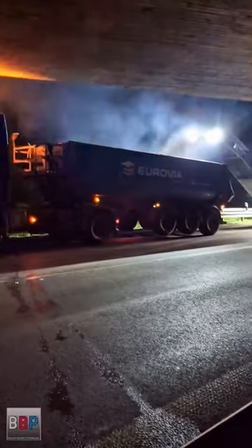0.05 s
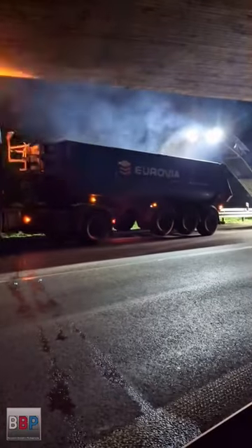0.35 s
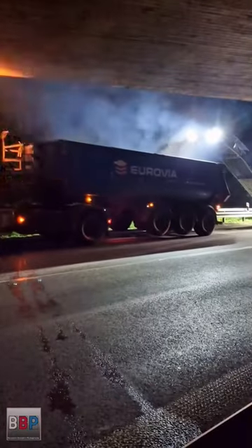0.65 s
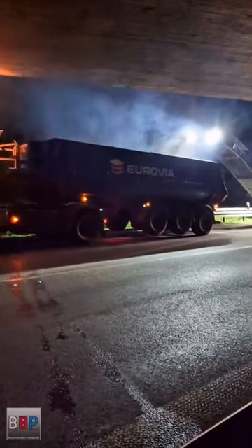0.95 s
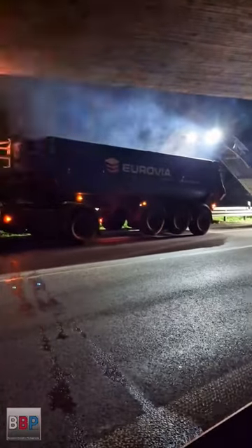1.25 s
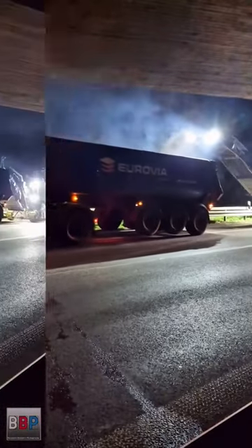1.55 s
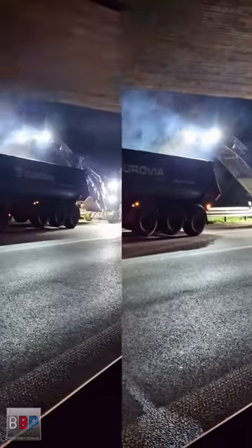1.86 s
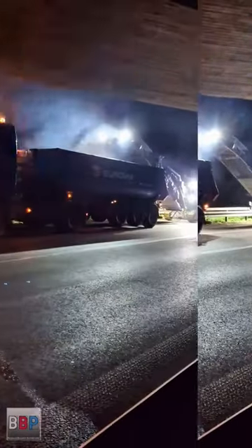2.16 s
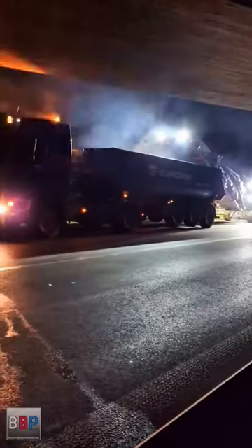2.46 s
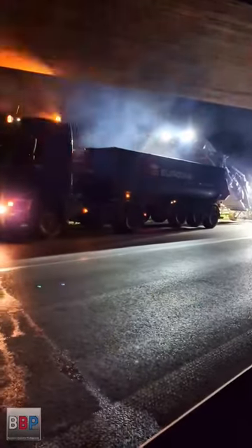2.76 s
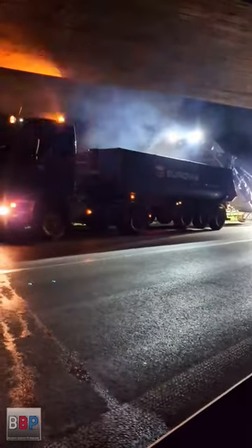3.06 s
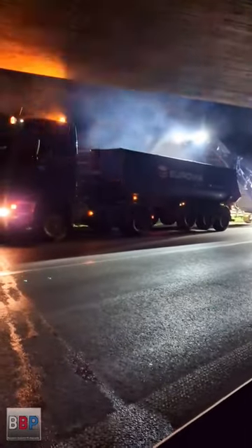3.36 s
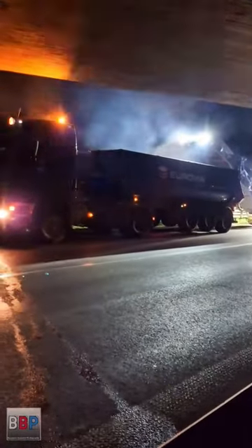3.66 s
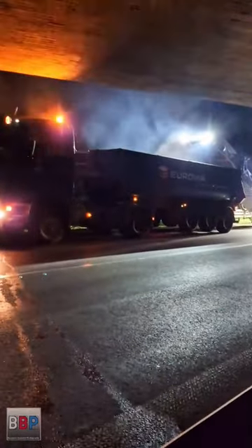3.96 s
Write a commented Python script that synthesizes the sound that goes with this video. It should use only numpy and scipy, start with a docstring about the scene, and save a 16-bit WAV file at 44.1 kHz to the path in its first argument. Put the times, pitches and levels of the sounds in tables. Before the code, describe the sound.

A heavy diesel truck idles over rumbling, hissing road machinery, with faint rattles.

```python
"""Under a concrete bridge at night roadworks, a heavy tipper truck idles while machines work behind it.
Its diesel makes low tones and a knock at each firing, and the knocks echo off the concrete.
The machines rumble, roar, drone, hiss and rasp, and a low engine hum throbs unevenly.
Loose parts rattle faintly, grit ticks on steel, and a valve lets off one short puff of air."""
import sys
import numpy as np
from scipy import signal
from scipy.fft import rfft, irfft
from scipy.io import wavfile

SR = 44100
rng = np.random.default_rng(int(sys.argv[2]) if len(sys.argv) > 2 else 0)


def to_wav(sig):
    """Store sig (one row per channel, or 1-D mono) as 16-bit WAV at the path in sys.argv[1].

    Samples outside -1..1 are clipped; the rate is SR.
    """
    pcm = np.clip(np.atleast_2d(sig), -1, 1) * 32767
    pcm = np.round(pcm).astype(np.int16)
    wavfile.write(sys.argv[1], SR, pcm.T)  # frames by channels


N = 176400
TIME_S = np.arange(N) / SR
FREQS_HZ = np.fft.rfftfreq(N, 1 / SR)


def gain(db):
    """Turns decibels into a number to multiply by."""
    return 10 ** (np.asarray(db) / 20)


def unit(x):
    """Scales a signal to an average (rms) size of 1."""
    return x / np.sqrt(np.mean(x ** 2) + 1e-20)


def across_pitch(table):
    """Joins a table's points into a value for every frequency."""
    hz, value = np.transpose(table)
    return np.interp(np.log(FREQS_HZ + 1), np.log(hz + 1), value)


def over_time(table, column=1):
    """Joins a table's levels into a gain for every moment."""
    rows = np.array(table)
    return gain(np.interp(TIME_S, rows[:, 0], rows[:, column]))


def drift(rate_hz):
    """Random wandering of size 1, mostly slower than rate_hz."""
    return unit(irfft(rfft(rng.standard_normal(N)) / (1 + (FREQS_HZ / rate_hz) ** 2), N))


def noise():
    """Two unrelated white noises."""
    return rng.standard_normal((2, N))


# How alike the left and right sides sound: pitch_hz, likeness (0 to 1)
SIDE_LIKENESS = [(100, 0.99), (260, 0.99), (360, 0.84), (520, 1), (720, 0.83), (860, 0.25), (1120, 0.78),
                 (1500, 0.3), (2000, 0.49), (2600, 0.036), (15000, 0.027)]
# How much louder the left side is: pitch_hz, difference_db
LEFT_LOUDER = [(100, 0.4), (300, -2), (390, 4), (520, -1), (750, -1.5), (1020, 2), (1500, -5.5), (2000, -7),
               (2600, -1), (4100, -7), (5000, 1), (6300, 3.5), (7300, -0.5), (9500, 3), (11800, -2),
               (15000, 0)]
# How far the left side's wave runs ahead: pitch_hz, phase_rad
LEFT_AHEAD = [(50, 0.05), (350, 0.26), (520, -0.8), (840, 0.85), (1130, -1), (1550, 0.5), (1800, 1.9),
              (2100, 1.45), (2400, 3.5)]

def stereo(pair, colour_db):
    """Colours two noises (sets how strong each pitch is) and spreads them left and right at size 1."""
    shared, separate = rfft(pair)
    alike = np.clip(across_pitch(SIDE_LIKENESS), 0, 1)
    lean = gain(across_pitch(LEFT_LOUDER) / 2)
    left = shared * lean * np.exp(1j * across_pitch(LEFT_AHEAD))
    right = (alike * shared + np.sqrt(1 - alike ** 2) * separate) / lean
    sides = irfft(np.array([left, right]) * gain(colour_db), N)
    return sides / np.std(sides.mean(0))


def bridge_echo(x, fade_60db_s=0.62, delay_s=.012, strength=1.3):
    """Sound bounces off the concrete deck and returns as a dense, fading echo."""
    t = TIME_S[:SR // 2]
    tail = rng.standard_normal((2, len(t))) * gain(-60 * t / fade_60db_s) * (t > delay_s)
    tail /= np.linalg.norm(tail, axis=1, keepdims=True)
    return x + strength * signal.fftconvolve(x, tail, axes=1)[:, :N]


# The engine's tones: waves_per_cycle (in one cycle, every cylinder fires once)
ENGINE_TONES = [6, 10, 12, 18, 20, 24, 30, 33]
# How strong each of those tones is: level_db
ENGINE_TONE_LEVELS = [-40.5, -37, -30.5, -32, -35, -29.5, -35.5, -35]
# How hard each of the six cylinders knocks: level_db
CYLINDER_LEVELS = [-1.5, -7.5, 1.5, -1.5, -1, -5.5]
# Colour of the knocks: pitch_hz, level_db
KNOCK_COLOUR = [(150, -22), (260, 1.5), (370, -8.5), (520, 4), (900, -10), (1500, -6), (2500, -17),
                (4000, -18.5), (7000, -36)]
# Slow swells of the engine's tones and the machinery: time_s, bass_db, middle_db
SWELLS = [(0, 1.5, 2.5), (0.35, 1, 0.8), (0.65, 1.1, 0.2), (0.95, 0.8, 1.0), (1.3, 1, 1.1),
          (1.55, 0.5, -0.4), (1.8, -3, -2.5), (2.05, -3.5, -3.2), (2.3, -1, -2), (2.55, 0.5, 0),
          (2.85, -0.5, -1.5), (3.15, -1, 1), (3.5, -1, -0.7), (3.75, -0.5, -0.6), (4, -3.5, -0.5)]

def diesel(firing_hz=35.73, speed_wander=.004, waver_db=3, knock_db=-34, knock_s=0.0071, scatter_db=3.5):
    """Cylinders fire in turn, making low tones and knocks that follow one slightly wandering speed."""
    firings = np.cumsum(firing_hz * (1 + speed_wander * drift(1.5))) / SR
    cylinders = len(CYLINDER_LEVELS)
    tones = 0
    for waves, db in zip(ENGINE_TONES, ENGINE_TONE_LEVELS):
        peak = gain(db + waver_db * drift(1.3)) * np.sqrt(2)
        tones += peak * np.sin(2 * np.pi * (waves * firings / cylinders + rng.random()))
    count = firings.astype(int)
    uneven_db = scatter_db * rng.standard_normal(400)[count]
    strength = gain(np.array(CYLINDER_LEVELS)[count % cylinders] + uneven_db)
    since_firing_s = (firings % 1) / firing_hz
    knocks = noise() * strength * np.exp(-since_firing_s / knock_s)
    clatter = stereo(bridge_echo(knocks), across_pitch(KNOCK_COLOUR))
    return over_time(SWELLS) * tones + gain(knock_db) * clatter


def panel_ring(hz, width_hz):
    """A shaken steel panel rings around one pitch."""
    return stereo(noise(), -20 * np.log10(1 + (2 * (FREQS_HZ - hz) / width_hz) ** 2))


# Colour of the machines' low rumble: pitch_hz, level_db
RUMBLE_COLOUR = [(12, -40), (20, -19), (36, -21), (62, -4.5), (112, -1), (166, -3), (238, -4.5), (300, -9),
                 (370, -17), (490, -33), (840, -120)]
# Colour of their higher roar: pitch_hz, level_db
ROAR_COLOUR = [(220, -50), (380, -9), (470, -1.5), (513, -2), (559, -1), (665, -7.5), (772, -5.5),
               (941, -9.5), (1270, -11.5), (1490, -11), (1700, -15), (2040, -15.5), (2500, -25.5),
               (3250, -67), (5500, -120)]
# Their ringing steel panels: pitch_hz, width_hz, level_db
STEEL_PANELS = [(401, 12.5, -40.5), (472, 25, -37.5), (569, 76, -36.5), (1502, 28, -44), (3465, 130, -52.5)]

def machinery(rumble_db=-18.5, roar_db=-25.5, rumble_shudder_db=1.0, roar_shudder_db=0.98):
    """Road machines rumble and roar with one shared shudder while their panels ring."""
    shudder = drift(rate_hz=25)
    rumble = gain(rumble_db + rumble_shudder_db * shudder) * stereo(noise(), across_pitch(RUMBLE_COLOUR))
    roar = gain(roar_db + roar_shudder_db * shudder) * stereo(noise(), across_pitch(ROAR_COLOUR))
    panels = sum(gain(db) * panel_ring(hz, width_hz) for hz, width_hz, db in STEEL_PANELS)
    bass, middle = over_time(SWELLS, column=1), over_time(SWELLS, column=2)
    return bass * rumble + middle * (roar + panels)


# Rise and fall of the deepest bass: time_s, boost_db
DEEP_SWELLS = [(0, 7), (.13, -5), (.45, -3), (.8, 1.5), (1.17, 1.5), (1.3, -4), (1.5, 0), (1.72, 3),
               (1.8, -9), (2.0, -4), (2.08, 4), (2.4, -2), (2.8, 2), (2.97, -1), (3.27, 3.5), (3.42, -4),
               (3.55, 0), (3.92, 5.5)]

def heave(x, below_hz=83):
    """Makes the deepest bass of a sound swell and sink."""
    deep = irfft(rfft(x) / (1 + (FREQS_HZ / below_hz) ** 8), N)
    return x + (over_time(DEEP_SWELLS) - 1) * deep


def wavering_tone(hz, wander_hz):
    """A held tone whose pitch wanders by about wander_hz."""
    turns = np.cumsum(hz + wander_hz * drift(rate_hz=9)) / SR + rng.random()
    return np.sqrt(2) * np.sin(2 * np.pi * turns)


# The hum that the bridge gathers: time_s, level_db
HUM_LEVELS = [(0, -32), (.3, -34), (.65, -35), (.95, -28), (1.3, -27), (1.65, -31), (1.85, -27), (2.1, -33),
              (2.55, -32), (2.9, -26), (3.2, -28), (3.5, -23.5), (3.75, -24.5), (4, -23.5)]
# Short throbs on top of it: peak_s, level_db
HUM_THROBS = [(.31, -20), (.92, -19), (1.06, -24), (1.3, -18), (2.48, -22), (2.6, -21), (3.1, -22),
              (3.39, -24), (3.49, -22), (3.7, -34), (3.96, -22)]

def hum(pitch_hz=113.5, throb_s=.028, chug_db=3.5):
    """The engines' low hum gathers under the deck, chugging and throbbing unevenly."""
    throbs = sum(gain(db) * np.exp(-((TIME_S - peak_s) / throb_s) ** 2) for peak_s, db in HUM_THROBS)
    chug = unit(gain(chug_db * np.clip(drift(rate_hz=22), -2, 2)))
    return (over_time(HUM_LEVELS) + throbs) * chug * wavering_tone(pitch_hz, wander_hz=4.96)


# The lower machine tone: time_s, level_db
LOW_DRONE = [(0, -36), (.12, -21.5), (.28, -31), (.45, -19), (.55, -23), (.66, -33), (1.1, -31), (1.7, -36),
             (2.2, -43), (2.52, -31.5), (2.8, -32), (3.3, -32), (4, -39)]
# The higher machine tone: time_s, level_db
HIGH_DRONE = [(0, -38), (.12, -21.5), (.3, -29), (.7, -26.5), (1.15, -25), (1.33, -27.5), (1.43, -36),
              (1.52, -20), (1.62, -22.5), (1.72, -36), (2.3, -42), (2.6, -29), (3.1, -30), (3.45, -32.5),
              (3.66, -28), (3.76, -19), (3.87, -27), (3.95, -45)]

def drones(low_hz=226.2, high_hz=245.8, wander_hz=3.48):
    """Two machine tones swell and fade, so close in pitch that they pulse against each other."""
    low = over_time(LOW_DRONE) * wavering_tone(low_hz, wander_hz)
    high = over_time(HIGH_DRONE) * wavering_tone(high_hz, wander_hz)
    return low + high


# Colour of the hiss: pitch_hz, level_db
HISS_COLOUR = [(1500, -32), (2500, 0), (4100, -0.5), (4800, 0), (5800, -1), (7500, -.5), (9700, -2.5),
               (11600, 0), (14600, -2), (15400, -5.5)]
# Rise and fall of the hiss: time_s, boost_db
HISS_SWELLS = [(0, 2), (0.15, 1.5), (0.55, 1.5), (0.84, 2.5), (0.92, -1.3), (1.0, 0.5), (1.1, 3), (1.42, 2),
               (1.7, 1), (1.95, -2.5), (2.28, -3.5), (2.55, -2), (2.85, -3.5), (3.1, -1.2), (3.3, -1.5),
               (3.55, -2.5), (3.67, -1.1), (4, -2.5)]

def hiss(level_db=-34.5, flutter_db=0.85, grit_per_s=500, grit_spread_db=5.5, grit_db=-11):
    """The working machines hiss unevenly, with fine ticks of grit mixed in."""
    sizes = gain(grit_spread_db * np.minimum(rng.exponential(1, (2, N)), 4))
    grit = unit(sizes * (rng.random((2, N)) < grit_per_s / SR))
    wash = stereo(noise() + gain(grit_db) * grit, across_pitch(HISS_COLOUR))
    return gain(level_db + flutter_db * drift(rate_hz=20)) * over_time(HISS_SWELLS) * wash


# Colour of the rasp: pitch_hz, level_db
RASP_COLOUR = [(1500, -27), (2600, -6), (3500, -4), (4100, -1), (4500, -6.5), (5200, -22), (9000, -45)]
# Rise and fall of the rasp: time_s, boost_db
RASP_SWELLS = [(0, 1), (.55, -0.5), (.85, -1), (1.25, 2.5), (1.7, -0.5), (2, -3.5), (2.3, -4.5), (2.6, 2.5),
               (2.82, -4), (3.08, 0.5), (3.27, -0.5), (3.47, 3), (3.54, -4), (3.67, 0.5), (4, -2.5)]

def rasp(level_db=-41, flutter_db=1.5):
    """The machines give off a fluttering metallic rasp."""
    loudness = gain(level_db + flutter_db * drift(rate_hz=35)) * over_time(RASP_SWELLS)
    return loudness * stereo(noise(), across_pitch(RASP_COLOUR))


def burst(start_s, rise_s, decay_s, db, colour_db):
    """Coloured noise that rises and dies away."""
    t = TIME_S - start_s
    shape = np.clip(t / rise_s, 0, 1) * np.exp(-np.maximum(t - rise_s, 0) / decay_s)
    return gain(db) * shape * stereo(noise(), colour_db)


# Shakes of loose parts: start_s, level_db, pitch_hz, decay_s
LOOSE_PARTS = [(0.504, -25.5, 1690, 0.033), (1.01, -23, 595, 0.022), (1.231, -32, 3500, .02),
               (2.166, -32, 2500, .008), (3.655, -36, 5000, .02)]

def rattles(rise_s=0.0017, width_octaves=0.98):
    """Loose parts shake, each making a brief scratchy noise around its own pitch."""
    shakes = 0
    for start_s, db, hz, decay_s in LOOSE_PARTS:
        octaves_away = np.log2((FREQS_HZ + 1) / hz)
        shakes += burst(start_s, rise_s, decay_s, db, -6 * (octaves_away / width_octaves) ** 2)
    return shakes


# Grit hitting steel: start_s, level_db
GRIT_HITS = [(1.0225, -25), (1.0270, -24.5), (1.1865, -32), (1.2280, -22), (1.2745, -26)]
# Colour of each hit: pitch_hz, level_db
HIT_COLOUR = [(1000, -15), (3000, 5), (6000, -3), (9000, 2), (13000, 0), (15400, -5)]

def grit_ticks(rise_s=0.00034, crack_s=0.0026, tail_s=0.02, tail_drop_db=12.5):
    """Bits of grit strike steel: a sharp crack and a short, quieter tail."""
    colour = across_pitch(HIT_COLOUR)
    ticks = 0
    for start_s, db in GRIT_HITS:
        ticks += burst(start_s, rise_s, crack_s, db, colour)
        ticks += burst(start_s, rise_s, tail_s, db - tail_drop_db, colour)
    return ticks


# The puff from the valve: start_s, level_db
VALVE_PUFFS = [(2.356, -27.5)]
# Colour of the escaping air: pitch_hz, level_db
AIR_COLOUR = [(1000, -18), (1750, -6), (2050, 5), (2500, 2), (2850, -3), (3150, 0), (3500, 2), (4200, -4),
              (5000, -12), (14000, -19)]

def air_puff(rise_s=.04, decay_s=0.06):
    """A valve lets off a little air."""
    return sum(burst(start_s, rise_s, decay_s, db, across_pitch(AIR_COLOUR)) for start_s, db in VALVE_PUFFS)


def scene():
    """The truck and the machines run throughout, with a few short sounds on top."""
    running = heave(diesel() + machinery()) + hum() + drones() + hiss() + rasp()
    return running + rattles() + grit_ticks() + air_puff()


def record(dry):
    """Cuts away the very highest treble."""
    low_pass = signal.firwin(801, cutoff=15480, window=("kaiser", 9), fs=SR)
    return signal.oaconvolve(dry, low_pass[None], "same")


dry = scene()
out = record(dry)
to_wav(out)
```